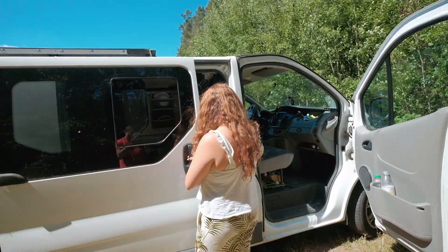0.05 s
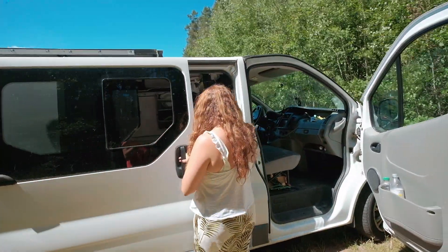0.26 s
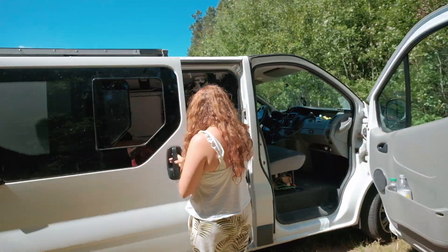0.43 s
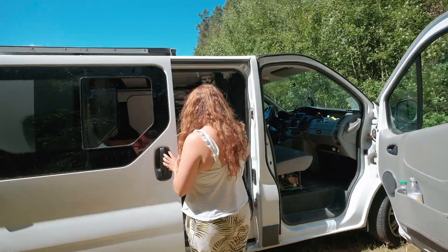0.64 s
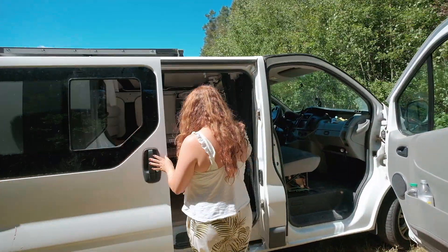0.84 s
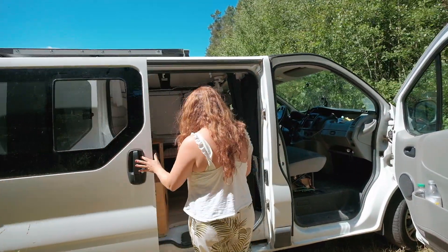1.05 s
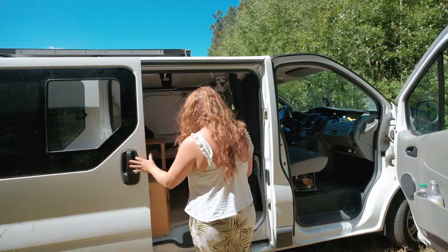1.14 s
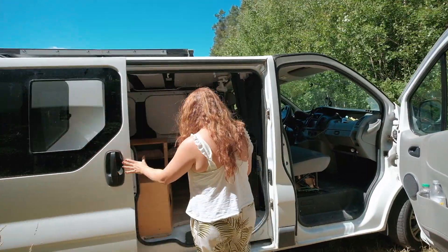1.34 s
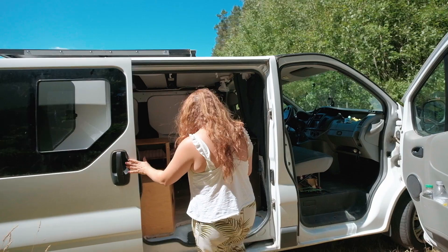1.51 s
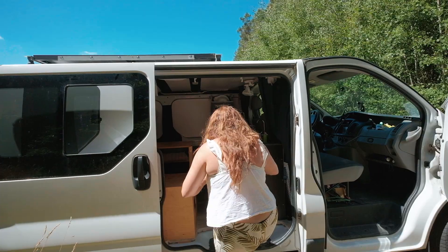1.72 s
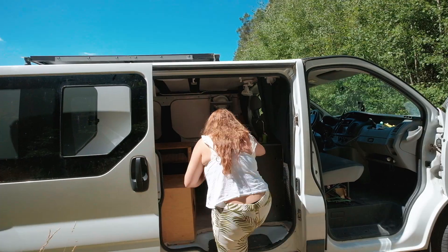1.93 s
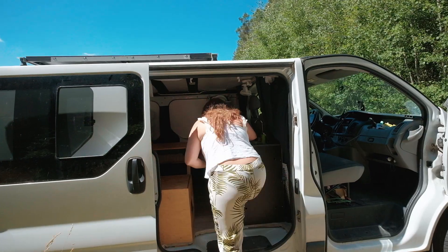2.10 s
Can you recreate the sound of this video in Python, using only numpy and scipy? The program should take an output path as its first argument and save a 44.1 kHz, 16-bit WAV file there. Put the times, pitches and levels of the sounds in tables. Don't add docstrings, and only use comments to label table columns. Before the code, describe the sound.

Sliding van door grinds along its track, the hollow cabin booming and a roller thumping, until heavy thuds and sharp steel snaps stop it; then a quiet yard, light air on a nearby microphone, faint clicks.

```python
import sys
import numpy as np
from scipy import signal
from scipy.io import wavfile
from scipy.ndimage import uniform_filter1d

SR = 44100
rng = np.random.default_rng(int(sys.argv[2]) if len(sys.argv) > 2 else 0)


def generate_wav(sig):
    pcm = np.round(np.clip(np.atleast_2d(sig).T, -1, 1) * 32767).astype(np.int16)
    wavfile.write(sys.argv[1], SR, pcm)


def volts(x):
    e = np.asarray(x, float) / 20
    return 10 ** e


N = 95476
HIT_SIZE = 9000
HIT_RISE_S = 0.005


def evened(x):
    return x / np.sqrt(np.mean(x ** 2) + 1e-20)


def steadied(x, span_s):
    power = uniform_filter1d(x ** 2, round(span_s * SR))
    power = uniform_filter1d(power, round(span_s * SR / 2))
    return x / np.sqrt(abs(power) + 1e-3)


def read(points, hz):
    f, value = np.transpose(points)
    return np.interp(np.log(hz + 1), np.log(f + 1), value)


def curve(points, order=1):
    table = np.transpose(points)
    return np.interp(np.arange(N) / SR, table[0], table[order])


def coloured(x, gain):
    log_gain = np.log(np.maximum(gain(abs(np.fft.fftfreq(16384, 1 / SR))), 1e-5))
    taps = np.fft.ifft(np.exp(np.conj(signal.hilbert(log_gain)))).real[:8192]
    return signal.oaconvolve(x, taps)[:len(x)]


def hiss(colour):
    noise = rng.standard_normal(N + 9000)
    return evened(coloured(noise, lambda hz: volts(read(colour, hz)))[9000:])


def wobble(rate_hz):
    return evened(signal.lfilter(*signal.butter(2, rate_hz, fs=SR), rng.standard_normal(N)))


def burst(t60, size=HIT_SIZE):
    return rng.standard_normal(size) * volts(-60 * np.arange(size) / SR / t60)


def by_band(decays, tilt_db=0):
    total = 0
    for k, (hz, t60) in enumerate(decays):
        edges_hz = [hz / 1.424, min(hz * 1.395, 0.45 * SR)]
        band = signal.butter(2, edges_hz, "band", fs=SR, output="sos")
        total = total + volts(tilt_db * k / 2) * signal.sosfilt(band, burst(t60, size=20000))
    return total


def ring(modes, detune):
    t = np.arange(HIT_SIZE) / SR
    chance = rng.uniform(-1.26, 1, (len(modes), 2))
    x = np.zeros(HIT_SIZE)
    for (hz, db, t60), (uneven, off) in zip(modes, chance):
        x += volts(db + 6 * uneven - 60 * t / t60) * np.sin(2 * np.pi * hz * (1 + detune * off) * t)
    return x / abs(x).max()


def soft_start():
    return np.minimum(np.arange(HIT_SIZE) / SR / HIT_RISE_S, 1)


def lumpy(size=20000):
    chatter_db = 3 * evened(uniform_filter1d(rng.standard_normal(size), 90))
    return volts(chatter_db) * np.minimum(np.arange(size) / SR / 0.0015, 1)


def add(mix, s, sound):
    part = mix[round(s * SR):][:len(sound)]
    part += sound[:len(part)]


# pitch_hz [Hz], width_hz [Hz], level_db [dB]
PANEL = [(124, 22, 2), (380, 30, 2), (530, 20, 3), (625, 20, 1), (730, 22, 2), (875, 18, 7), (1025, 20, 9)]


def peaks(hz, body=PANEL):
    power = volts(2 * -0.5)
    for pitch_hz, width_hz, level_db in body:
        power = power + volts(2 * level_db) / (1 + (2 * (hz - pitch_hz) / width_hz) ** 2)
    return np.sqrt(power)


# time_s [s], load_db [dB], upper_drone_db (speed) [dB]
ROLL = [(0, -30.5, -12.5), (.05, -37, -13), (.13, -40.5, -9), (.18, -33.5, -17.5), (.28, -31.5, -14.5),
        (.38, -32.5, -9), (.5, -29.5, -10.5), (.62, -38.5, -5), (.72, -38, -3.5), (.85, -33, -7),
        (1.0, -34.5, -6.5), (1.15, -34.5, -6.5), (1.28, -26.5, -13), (1.345, -41.5, 4), (1.365, -46, 0.5),
        (1.4, -22, -7.5)]
# pitch_hz [Hz], density_db [dB per Hz]
ROLL_COLOUR = [(24, -3), (40, -17), (65, -13), (118, -3), (235, -7.5), (320, -9), (999, -23.5),
               (1210, -28.5), (4000, -50.5), (5200, -76), (8800, -120)]
# time_s [s], pitch_hz [Hz], level_db above the roll [dB]
BOOM = [
    (0, 214, -4.5),
    (.45, 204.6, -13.5),
    (.56, 236.2, 2),
    (.86, 249, 1),
    (.92, 218, -9.5),
    (1.0, 208, -0.5),
    (1.14, 216.6, 0.5),
    (1.26, 219.6, -3.5),
    (1.4, 214, -8.5),
]
ROLL_END_S, ROLL_FADE_S = 1.42, 0.03
GRIT_PER_S, GRIT_SPREAD_DB, ROLL_WOBBLE_DB = 9000, 1.5, 1.5
SPLIT_HZ, BOOM_WIDTH_HZ = 371, 25


def rollers():
    grit = rng.standard_normal(N) * volts(GRIT_SPREAD_DB * rng.exponential(1, N))
    grit = grit * (rng.random(N) < GRIT_PER_S / SR)
    grit = grit * volts(ROLL_WOBBLE_DB * wobble(19))

    def upper(hz):
        return 1 / (1 + (SPLIT_HZ / (hz + 1)) ** 4)

    def panel(hz):
        return volts(read(ROLL_COLOUR, hz)) * peaks(hz)

    low = coloured(grit, lambda hz: panel(hz) * (1 - upper(hz)))
    high = coloured(grit, lambda hz: panel(hz) * upper(hz))
    turn = np.exp(2j * np.pi * np.cumsum(curve(BOOM)) / SR)
    r = np.exp(-np.pi * BOOM_WIDTH_HZ / SR)
    boom = (turn * signal.lfilter([(1 - r) ** 2], np.convolve([1, -r], [1, -r]), grit / turn)).real
    drone = 0.85 * steadied(evened(low), 0.062)
    drone = drone + volts(curve(ROLL, order=2)) * steadied(evened(high), 0.02)
    drone = drone + volts(curve(BOOM, order=2)) * steadied(evened(boom), 0.51)
    fade = np.clip((ROLL_END_S - np.arange(N) / SR) / ROLL_FADE_S, 0, 1)
    return drone * volts(curve(ROLL)) * fade


# start_s [s], thud_db [dB], tick_db [dB]
KNOCKS = [
    (0.162, -20, -56),
    (0.303, -16.5, -43),
    (0.433, -15.5, -33),
    (0.563, -10, -41),
    (0.688, -11, -33),
    (0.807, -9, -34),
    (0.923, -20.5, -38.5),
    (1.044, -18, -48),
    (1.16, -27, -43),
]
# pitch_hz [Hz], level_db [dB], t60_s [s]
KNOCK_MODES = [(113.2, -8.5, 0.13), (224.8, 2.5, 0.059), (397, -16, 0.07), (630, -9.5, 0.016)]


def knocks():
    out, rattle, soft = np.zeros(N), np.zeros(N), soft_start()
    boom_hz = curve(BOOM)
    for s, thud_db, tick_db in KNOCKS:
        tuning = boom_hz[round(s * SR)] / 235
        modes = [(hz * tuning, db, t60) for hz, db, t60 in KNOCK_MODES]
        add(out, s, volts(thud_db) * soft * ring(modes, 0.017))
        add(rattle, s, volts(tick_db) * soft * burst(0.092))
        add(out, s + 0.0028, volts(tick_db - 6) * soft * ring(BRACKET, 0.05))
    return out + coloured(rattle, lambda hz: volts(read(CLACK, hz) + 8) / (1 + (hz / 5500) ** 4))


# start_s [s], thud_db, clack_db, bracket_db, sharpness_db [dB]
BLOWS = [(1.302, -14, -24, -38, 1), (1.307, -19, -32, -38, -1), (1.328, -24, -32.5, -23, 4.5),
         (1.347, -28, -39, -58, -5), (1.379, -25, -33, -51, 5.5), (1.392, -9, -50, -48, -11),
         (1.395, -17.5, -26, -48, 6.5), (1.404, -13.5, -38, -54, 13), (1.413, -10, -24, -34, -1.5),
         (1.426, -20, -32.5, -27, 4), (1.441, -10.5, -34, -56.5, 4), (1.455, -10.5, -21.5, -22.5, 2),
         (1.469, -12.5, -39, -50, -11), (1.484, -23.5, -39, -46, 6), (1.521, -22, -35, -33.5, -4)]
# pitch_hz [Hz], density_db [dB per Hz]
THUD = [(15, -14), (25, -5.5), (82, -2.5), (152, -7.5), (250, -11), (515, -8), (816, -15), (884, -15.5),
        (3000, -35.5), (3900, -53), (6600, -120)]
# pitch_hz [Hz], t60_s [s]
THUD_T60 = [(35, 0.38), (80, 0.27), (180, 0.48), (400, 0.22), (900, 0.17), (2000, 0.18)]
# pitch_hz [Hz], density_db [dB per Hz]
CLACK = [(880, -22), (1500, -5.5), (2090, -16.5), (2810, -16), (3280, -18.5), (4580, -21), (6150, -29),
         (13100, -33.5), (15600, -38)]
# pitch_hz [Hz], t60_s [s]
CLACK_T60 = [(2200, 0.084), (4500, 0.11), (8000, 0.095), (12500, 0.026)]
# pitch_hz [Hz], width_hz [Hz], level_db [dB]
LATCH = [(1710, 40, 6), (2320, 82, 2), (2850, 120, 7), (3680, 240, -5), (8150, 630, 1.5), (13300, 930, -6)]
# pitch_hz [Hz], level_db [dB], t60_s [s]
BRACKET = [(4330, 0.5, 0.044), (4500, -4, 0.035), (4510, 5, 0.022)]


def catch():
    low, high, out, soft = np.zeros(N), np.zeros(N), np.zeros(N), soft_start()
    for s, thud_db, clack_db, bracket_db, sharpness_db in BLOWS:
        add(low, s, volts(thud_db) * by_band(THUD_T60))
        chatter = lumpy()
        add(high, s, volts(clack_db - 3) * chatter * by_band(CLACK_T60, sharpness_db))
        add(out, s, volts(bracket_db) * soft * chatter[:HIT_SIZE] * ring(BRACKET, 0.019))
    thuds = coloured(low, lambda hz: volts(read(THUD, hz) + 11) * np.sqrt(peaks(hz)))
    clacks = coloured(high, lambda hz: volts(read(CLACK, hz) + 14) * peaks(hz, LATCH))
    return out + thuds + clacks


# start_s [s], level_db [dB]
SNAPS = [(1.3035, -31), (1.3065, -31), (1.3305, -44), (1.3785, -43), (1.383, -44), (1.3965, -23),
         (1.3985, -30), (1.4045, -36), (1.4275, -40), (1.4565, -22), (1.4585, -30), (1.4865, -37)]
# pitch_hz [Hz], level_db [dB]
SNAP_COLOUR = [(800, -28), (3000, -12), (8500, -7.5), (13000, -11), (15600, -17)]


def snaps():
    out = np.zeros(N)
    for s, db in SNAPS:
        add(out, s, volts(db) * burst(0.0055, size=2000))
    return coloured(out, lambda hz: volts(read(SNAP_COLOUR, hz)))


# start_s [s], pitch_hz [Hz], level_db [dB], swell_s [s]
JOLTS = [(.005, 277, -37, 0.013), (.155, 291, -30, 0.0093), (0.194, 32.8, -21, 0.023),
         (0.231, 248, -38, .015), (.30, 287, -30, 0.011), (0.306, 130, -29.5, 0.011),
         (.43, 280.4, -35, 0.016), (0.444, 402, -33.5, 0.011), (.465, 200, -29, 0.029),
         (0.507, 136, -28.5, 0.02), (0.632, 124.5, -26.5, 0.013), (.725, 121.3, -22.5, 0.011),
         (.72, 36, -30, 0.015), (.806, 393, -34, 0.0074), (0.886, 423, -36, 0.0049),
         (.922, 377.7, -33.5, 0.013), (.945, 111, -28.5, 0.0078), (1.031, 204, -32, 0.0086),
         (1.04, 352, -27, 0.0071), (.265, 42, -29, 0.011), (1.149, 125, -27.5, .015),
         (1.158, 304, -29, 0.006), (1.185, 393, -29.5, 0.01), (1.46, 42.6, -20.5, 0.013),
         (1.307, 395, -25.5, 0.011), (1.302, 2320, -34.5, 0.0019), (1.303, 3835, -39.5, 0.002),
         (1.41, 4670, -41, 0.0035), (1.41, 722, -29, 0.0077), (1.334, 115, -25, 0.0091),
         (1.392, 360, -29, 0.0061), (1.391, 1627, -30, 0.0034), (1.402, 202, -21.5, 0.0077),
         (1.422, 163.7, -21, 0.01), (1.42, 895, -25, 0.0047), (1.443, 139.2, -31, 0.0073),
         (1.461, 61, -21, 0.0045), (1.465, 212, -18, 0.0086), (1.47, 369.4, -27.5, 0.0077),
         (1.48, 140, -23.5, 0.0077), (1.492, 241.6, -25.5, 0.0087), (1.504, 132, -35, 0.025),
         (1.525, 233, -40, 0.015), (1.568, 217, -37, 0.0091)]


def jolts():
    out, t = np.zeros(N), np.arange(HIT_SIZE) / SR
    for s, hz, db, swell_s in JOLTS:
        swell = t / swell_s * np.exp(1 - t / swell_s)
        add(out, s, volts(db) * swell * np.sin(2 * np.pi * hz * t))
    return out


# start_s [s], level_db [dB], pitch_hz [Hz], width_hz [Hz], t60_s [s]
TICKS = [(0, -38.5, 1980, 5000, 0.084), (.306, -42, 2520, 920, 0.053), (0.69, -46, 4530, 806, .06),
         (0.566, -43.5, 4930, 1800, .05), (1.712, -32, 168, 171, 0.12), (0.498, -49.5, 2680, 200, 0.075),
         (0.746, -44, 9100, 8800, 0.012), (0.869, -42.5, 6460, 2470, 0.017), (.878, -43, 6920, 2500, .02),
         (.92, -48, 4200, 900, 0.069), (1.863, -54, 3270, 700, .02), (1.937, -35, 3630, 4500, 0.022),
         (2.009, -41.5, 3600, 1600, 0.032), (2.071, -35, 1600, 2400, .01), (2.084, -51, 5160, 500, .03),
         (0.436, -42.5, 1800, 700, 0.079), (1.843, -43, 900, 1490, 0.085), (2.071, -41, 5940, 9000, 0.028)]


def ticks():
    out = np.zeros(N)
    for s, db, hz, width_hz, t60 in TICKS:
        drive = burst(t60, size=4000)
        drive[0] += 8
        click = coloured(drive, lambda f: 1 / (1 + (2 * (f - hz) / width_hz) ** 2))
        add(out, s, volts(db) * click / abs(click).max())
    return out


# time_s [s], level_db [dB], flap_db [dB]
AIR = [
    (0.0, -32, -6),
    (0.07, -22, -12),
    (.25, -21.5, -12),
    (.6, -21.5, -12.5),
    (.95, -20, -14),
    (1.2, -30, -12),
    (1.6, -33.5, -11.5),
    (2.14, -31, -17),
    (2.16, -37.5, -11),
]
# pitch_hz [Hz], density_db [dB per Hz]
AIR_COLOUR = [(2, -6), (6, 0), (13, -1), (22, -14), (45, -40), (200, -100)]
# pitch_hz [Hz], density_db [dB per Hz]
FLAP_COLOUR = [(12, -20), (28, 2), (40, -12), (70, -11.5), (150, -20), (400, -100)]


def air():
    push = steadied(hiss(AIR_COLOUR), 0.23)
    flap = volts(curve(AIR, order=2)) * steadied(hiss(FLAP_COLOUR), 0.12)
    return volts(curve(AIR)) * (push + flap)


# pitch_hz [Hz], density_db [dB per Hz]
LEAVES = [(1290, -8.5), (2200, -8), (2470, -15), (3080, -7.5), (4830, -3.5), (5690, -5.5), (7830, -9.5),
          (11400, -22), (15600, -53)]
# pitch_hz [Hz], density_db [dB per Hz]
YARD = [(29, -8.5), (50, -8.5), (179, -20), (233, -13.5), (296, -24), (1010, -30), (1550, -33),
        (6110, -52.5), (15600, -79)]
LEAVES_DB, LEAVES_DUCK_DB, LEAVES_DROP_DB, LEAVES_DROP_S = -60, -0.5, -4.5, 1.712
YARD_DB, SIDE_DB, SIDE_LATE_DB = -48.5, -76.5, -72.5


def outdoors():
    t = np.arange(N) / SR
    late = np.clip((t - LEAVES_DROP_S) / 0.0058, 0, 1)
    leaves_db = LEAVES_DB + LEAVES_DUCK_DB * np.clip((t - 1.3) / 0.56, 0, 1)
    leaves_db = leaves_db + LEAVES_DROP_DB * late + 0.36 * wobble(25)
    yard_db = YARD_DB + 0.4 * wobble(39)
    trace = volts(SIDE_DB + (SIDE_LATE_DB - SIDE_DB) * late) * rng.standard_normal((2, N))
    mid = volts(leaves_db) * hiss(LEAVES) + volts(yard_db) * hiss(YARD) + 1.65 * trace[0]
    return mid, trace[1]


def scene():
    pushes = air()
    floor, side = outdoors()
    mid = rollers() + knocks() + catch() + ticks() + floor + pushes + jolts() + snaps()
    side = side + volts(-41) * pushes
    return np.array([mid + side, mid - side])


def roll_off(x):
    return signal.sosfilt(signal.butter(12, 15720, fs=SR, output="sos"), x)


def record(dry):
    return roll_off(dry)


dry = scene()
out = record(dry)
generate_wav(out)
```